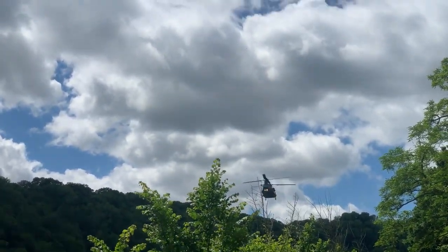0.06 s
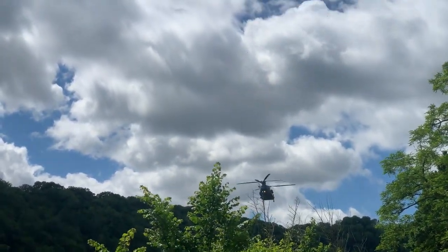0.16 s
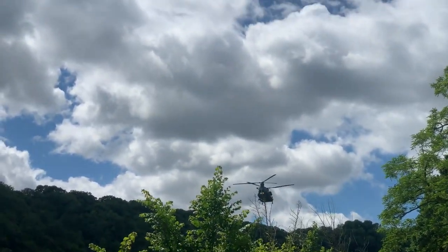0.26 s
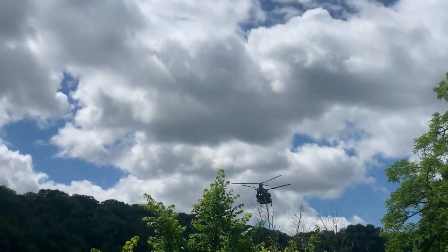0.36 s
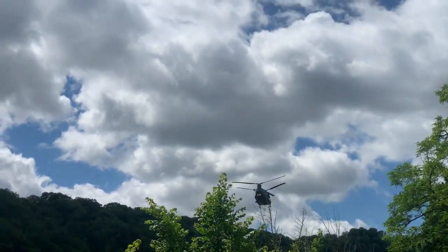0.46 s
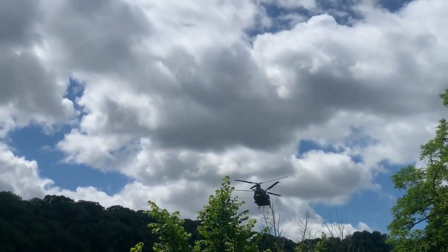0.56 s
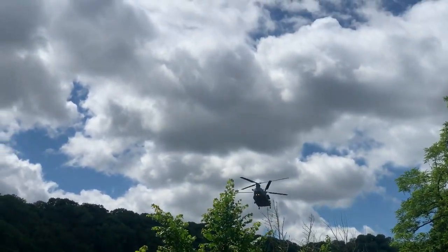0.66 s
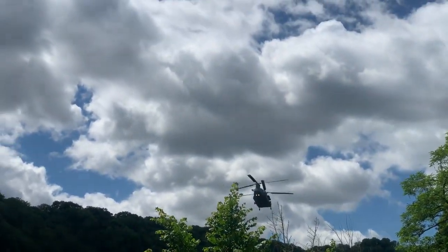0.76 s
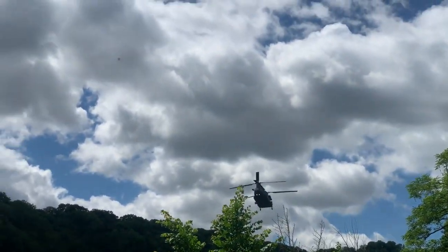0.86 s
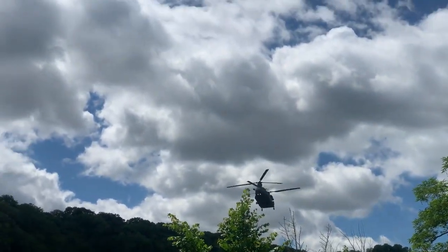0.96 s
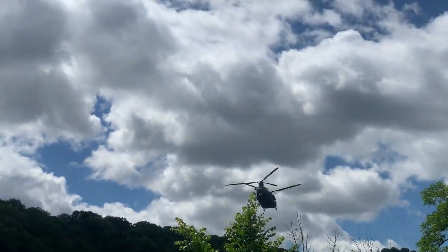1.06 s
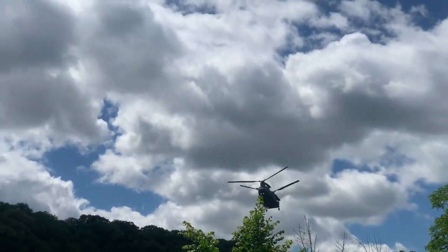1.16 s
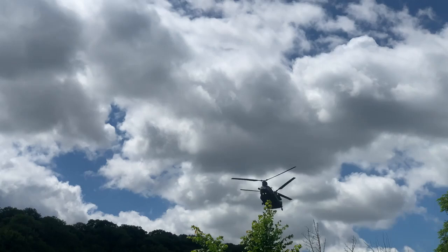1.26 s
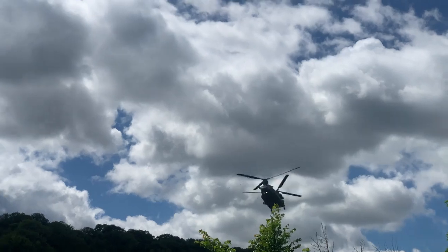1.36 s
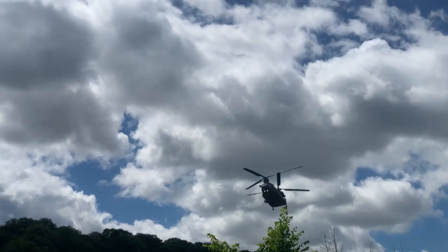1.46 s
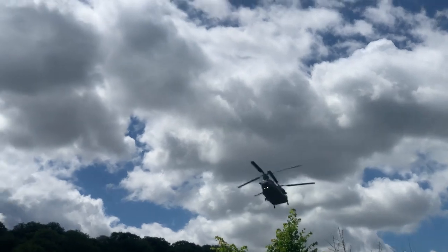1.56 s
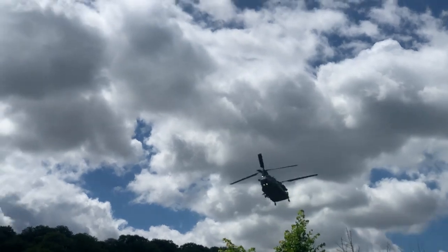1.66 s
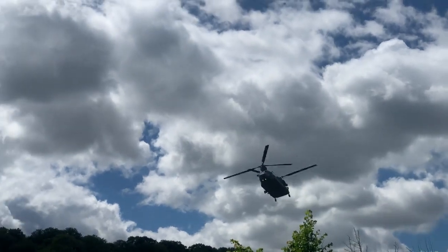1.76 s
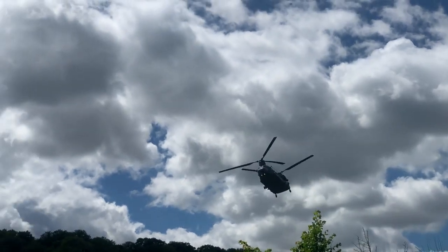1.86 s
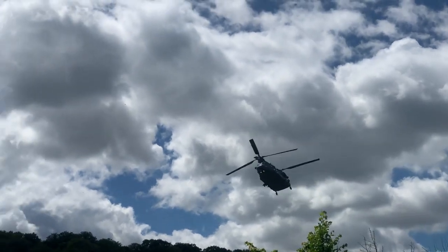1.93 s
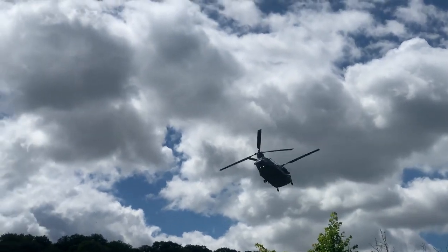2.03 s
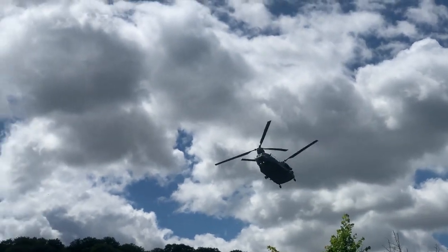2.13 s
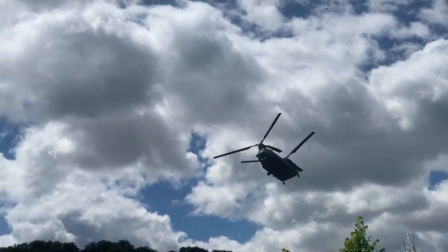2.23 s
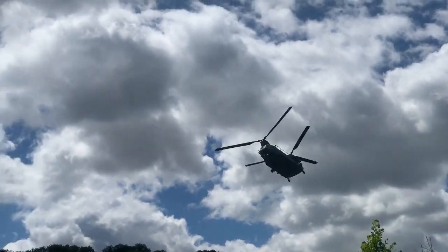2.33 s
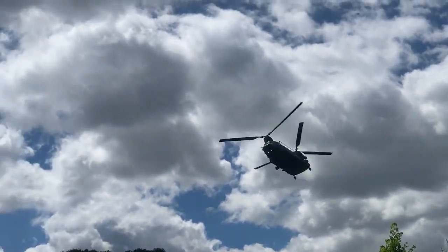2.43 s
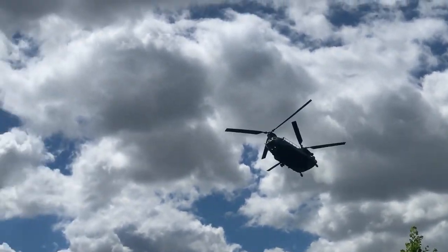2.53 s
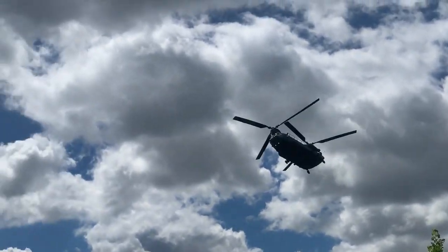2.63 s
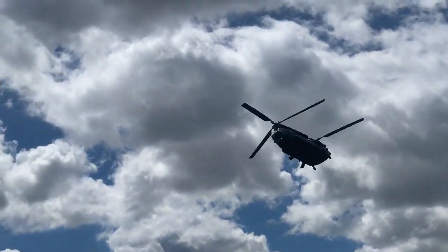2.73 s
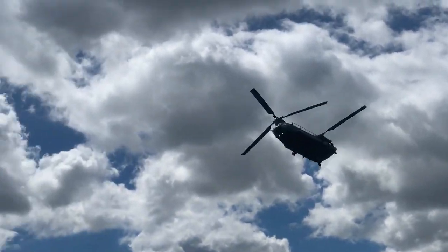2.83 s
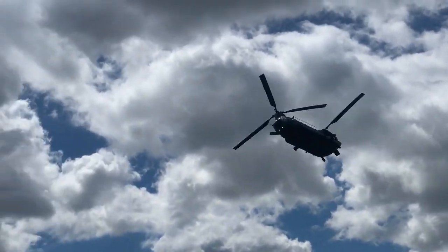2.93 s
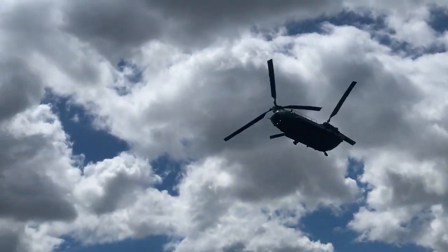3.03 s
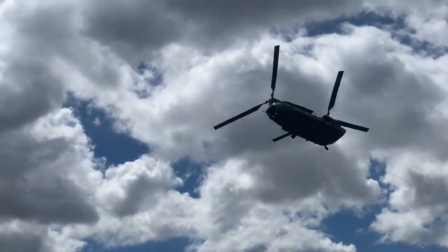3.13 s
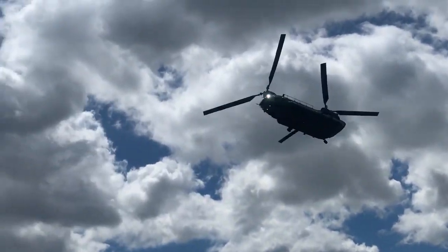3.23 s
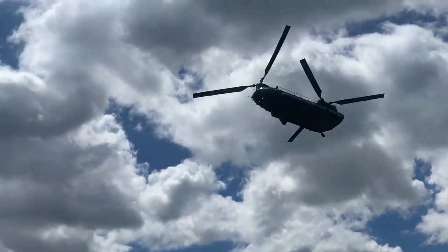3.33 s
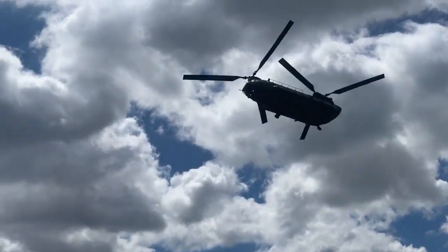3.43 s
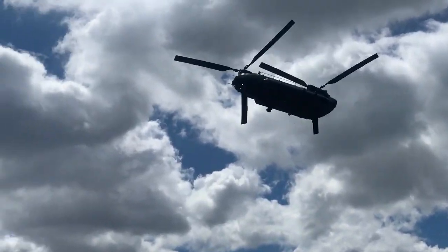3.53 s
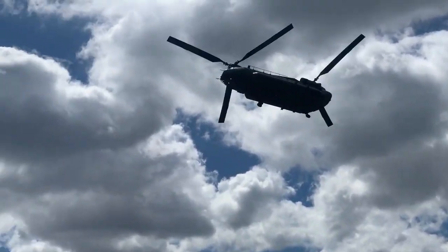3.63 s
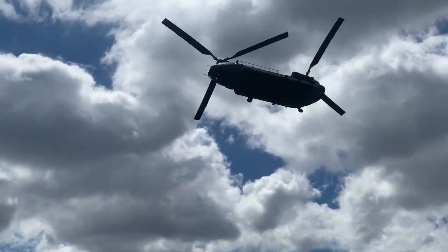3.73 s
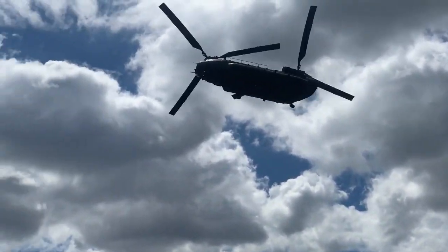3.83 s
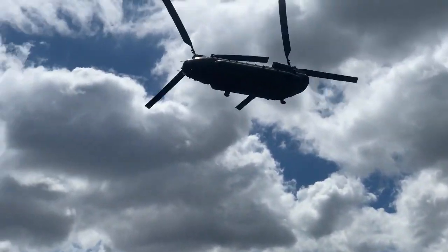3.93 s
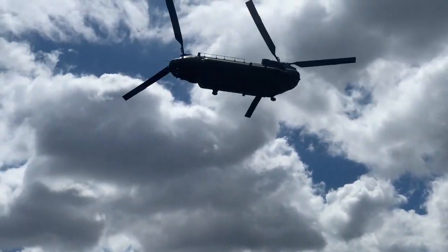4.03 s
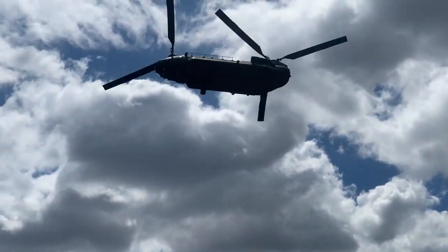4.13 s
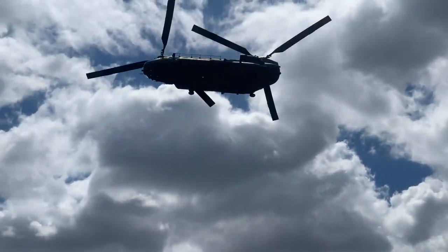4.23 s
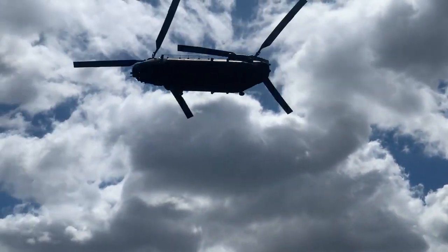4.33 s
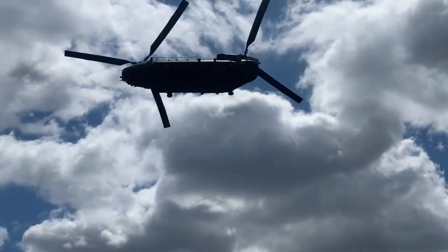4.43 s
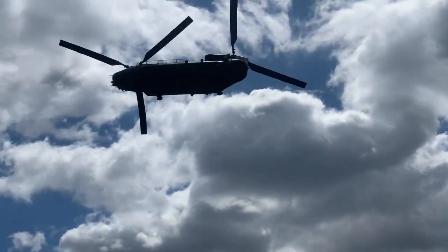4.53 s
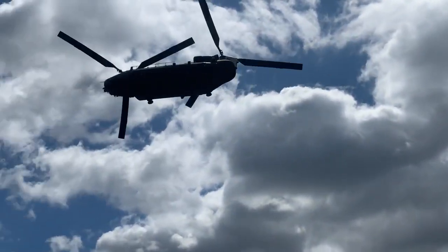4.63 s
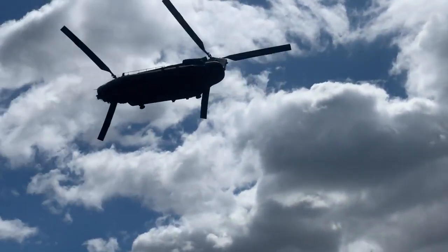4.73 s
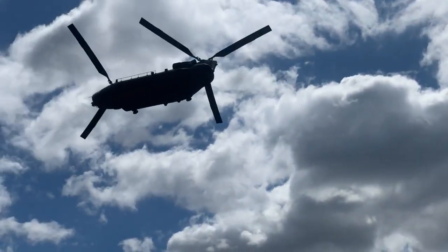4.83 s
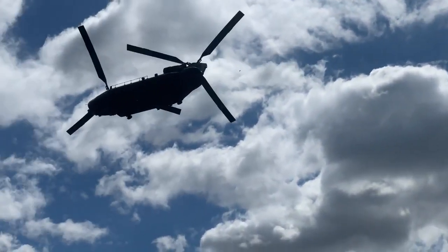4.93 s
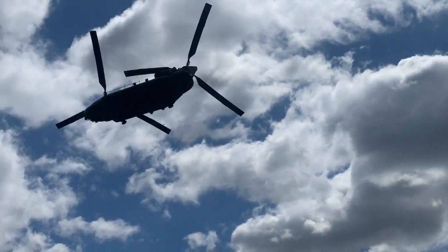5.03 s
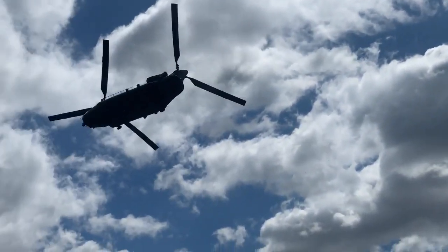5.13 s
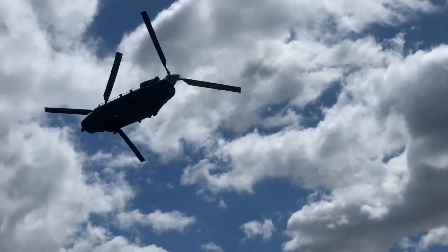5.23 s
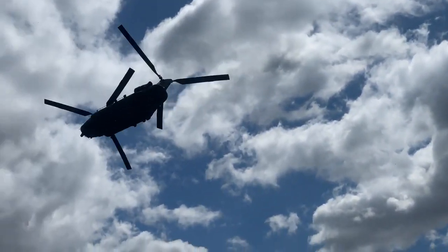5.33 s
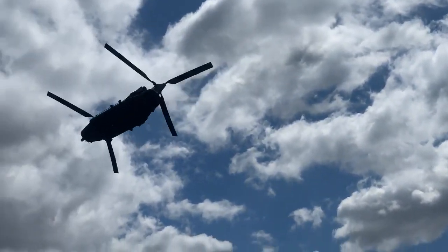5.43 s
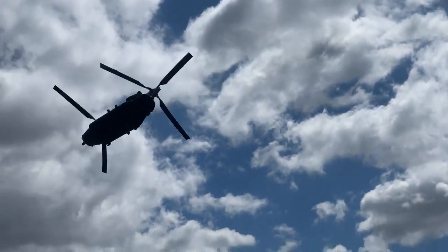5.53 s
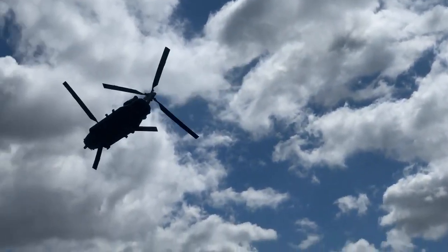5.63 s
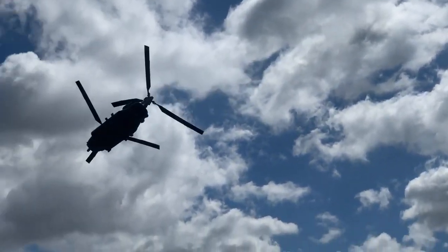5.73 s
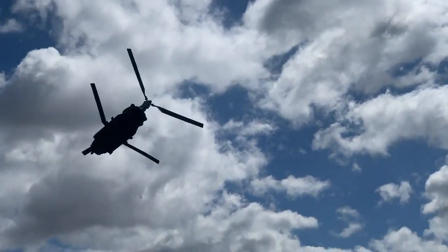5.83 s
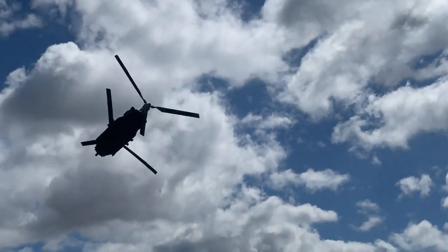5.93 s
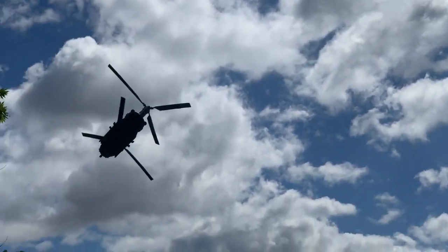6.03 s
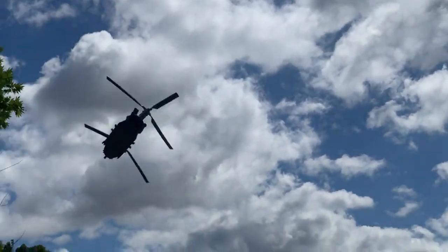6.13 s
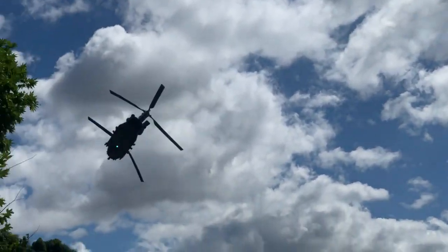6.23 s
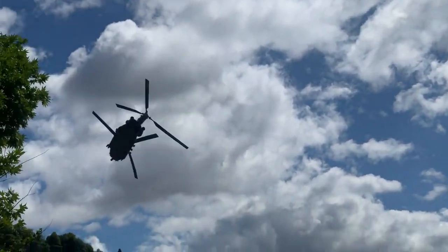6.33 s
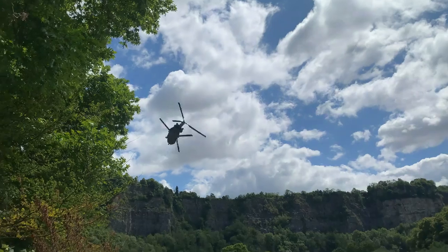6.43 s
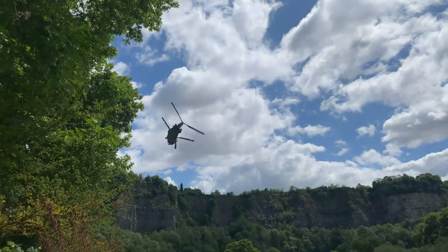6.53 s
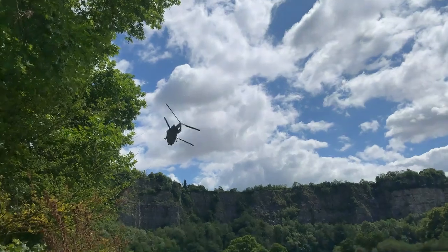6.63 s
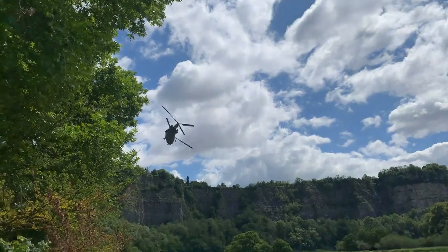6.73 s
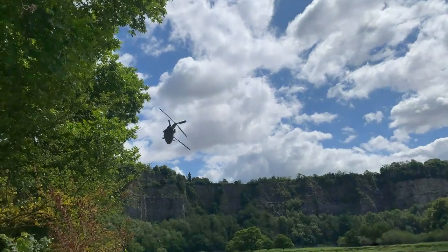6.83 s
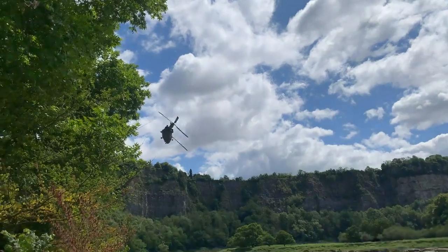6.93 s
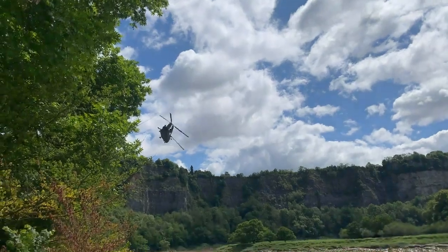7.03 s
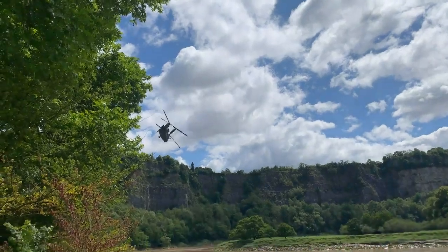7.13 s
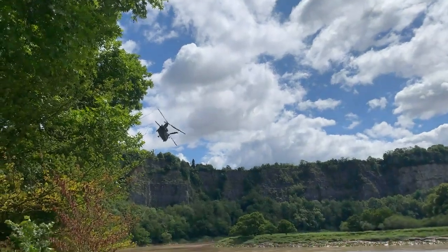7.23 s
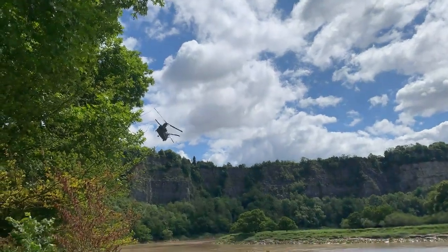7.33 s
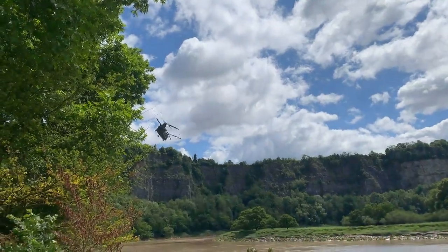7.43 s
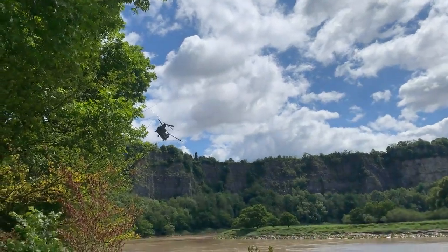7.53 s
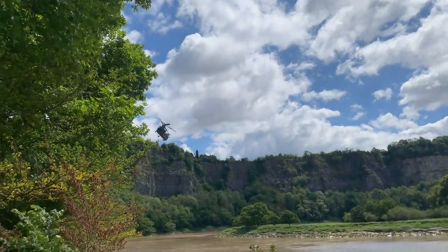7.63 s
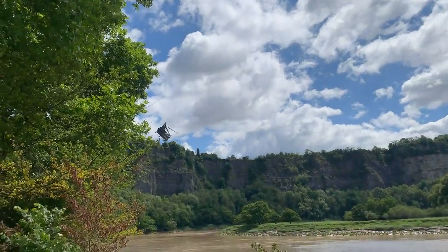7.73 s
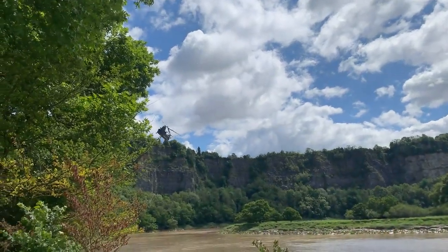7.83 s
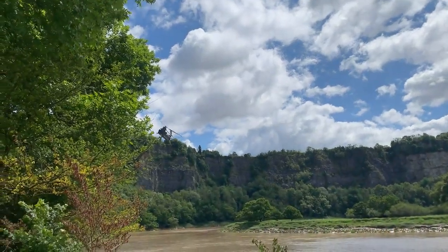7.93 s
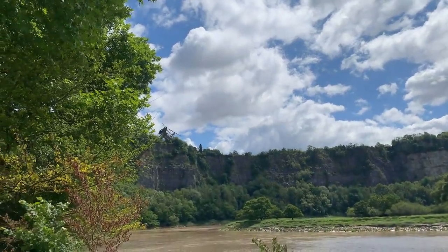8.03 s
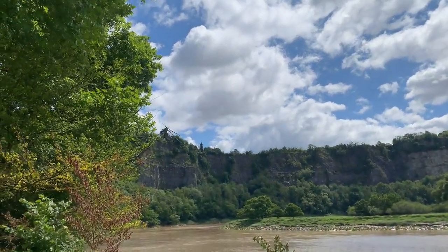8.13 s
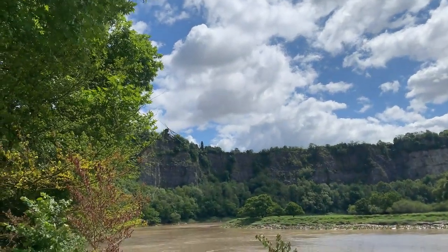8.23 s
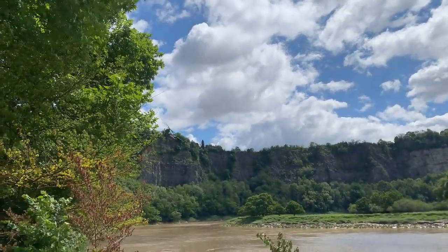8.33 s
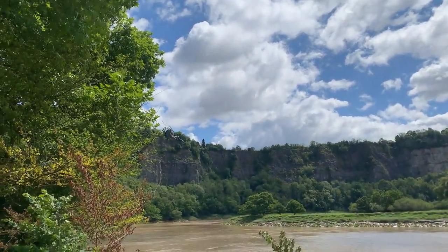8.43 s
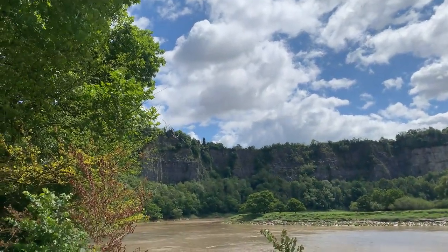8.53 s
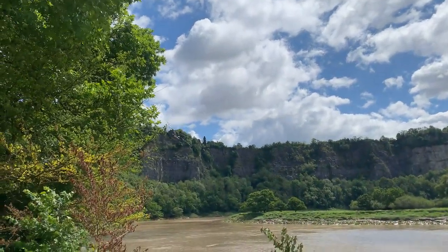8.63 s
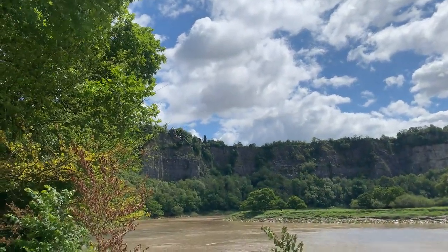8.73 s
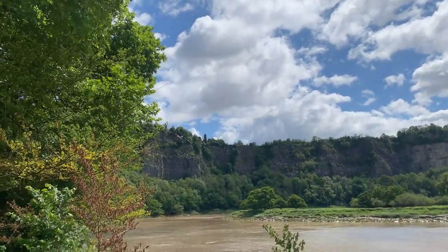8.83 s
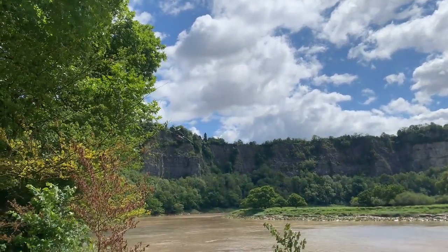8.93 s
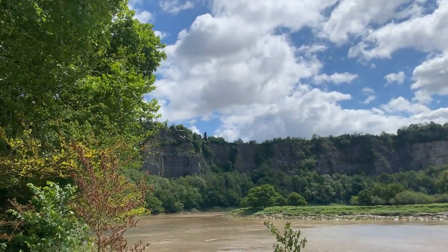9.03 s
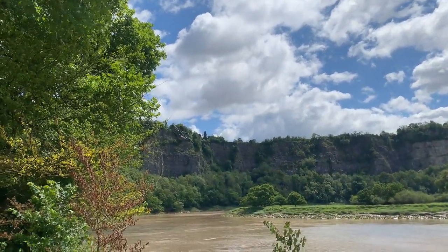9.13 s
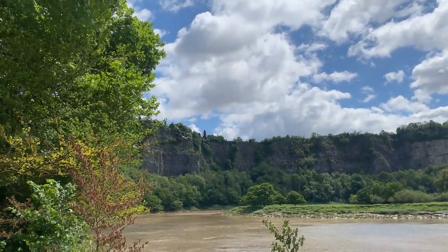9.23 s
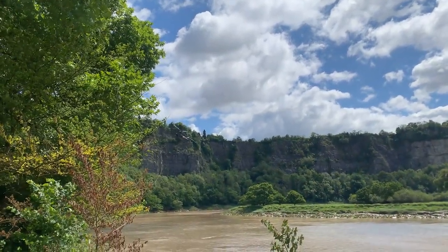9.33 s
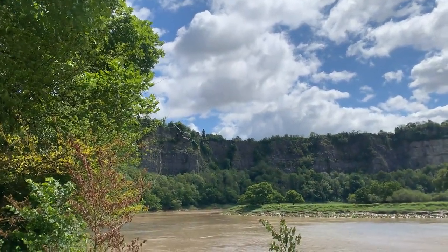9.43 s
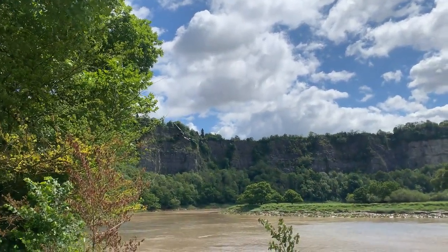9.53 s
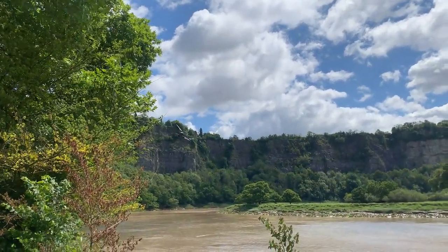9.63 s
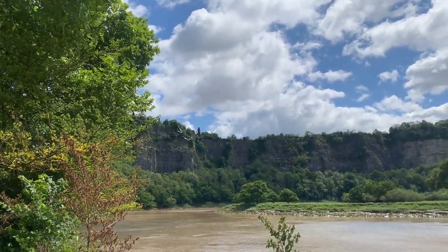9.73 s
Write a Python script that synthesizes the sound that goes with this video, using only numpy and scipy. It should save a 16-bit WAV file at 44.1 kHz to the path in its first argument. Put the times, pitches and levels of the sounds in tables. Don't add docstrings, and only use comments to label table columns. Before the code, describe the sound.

Fast chopping rotor slaps approach loudly, pass above with a downward pitch glide, then soften into a dull, distant throb across an open valley.

```python
import sys
import numpy as np
from scipy import signal
from scipy.fft import rfft, irfft, next_fast_len
from scipy.io import wavfile
from scipy.ndimage import uniform_filter1d, minimum_filter1d, map_coordinates

SR = 44100
rng = np.random.default_rng(int(sys.argv[2]) if len(sys.argv) > 2 else 0)


def waveform_to_disk(signal):
    frames = np.transpose(np.atleast_2d(signal))
    scaled = np.clip(frames, -1, 1) * 32767
    samples = np.round(scaled).astype(np.int16)
    wavfile.write(sys.argv[1], SR, samples)


def ratio_of_db(decibels):
    return 10 ** (np.asarray(decibels, float) / 20)


N = 430416
TIME = np.arange(N) / SR


def unit(x):
    return x / np.sqrt(np.mean(x ** 2) + 1e-20)


def along(points, hz):
    f, v = np.transpose(points)
    return np.interp(np.log(hz + 1), np.log(f + 1), v)


def curves(rows, at=TIME):
    s, *columns = np.transpose(rows)
    return [np.interp(at, s, column) for column in columns]


def wobble(rate):
    coarse = TIME[::16]
    knots = rng.standard_normal(int(N * rate / SR) + 4)
    return np.interp(TIME, coarse, map_coordinates(knots, [coarse * rate]))


def filtered(x, response):
    m = next_fast_len(N + 8192)
    return irfft(rfft(x, m) * response(np.fft.rfftfreq(m, 1 / SR)), m)[..., :N]


def delayed(x, ms, order=1):
    return map_coordinates(x, [np.arange(N) - ms * SR / 1000], order=order, mode="mirror")


# time in seconds, blades per second.
BLADE_RATE = [(0, 13.335), (1, 13.236), (1.5, 13.149), (2, 13.018), (2.5, 12.826), (3, 12.659),
              (3.5, 12.389), (4, 11.989), (4.5, 11.52), (5, 11.051), (5.5, 10.68), (6, 10.423),
              (6.5, 10.25), (7, 10.134), (8, 10.028), (8.5, 10.03), (9.5, 10.1)]


def blade_rate(at=TIME):
    return curves(BLADE_RATE, at)[0]


REST_RATE, MACH = 11.45, .142


def facing():
    return (1 - REST_RATE / blade_rate()) / MACH


START_M, CLOSEST_M = 242, 65


def distance():
    return START_M - 343 * np.cumsum(blade_rate() / REST_RATE - 1) / SR


def heard(db, spread, absorb_db, forward_db):
    r = distance()
    spreading_db = spread * 20 * np.log10(r / CLOSEST_M)
    absorption_db = absorb_db * (r - CLOSEST_M) / 100
    return db - spreading_db - absorption_db + forward_db * facing()


TREES_S = 7.6


def screen():
    return 1 / (1 + np.exp((TREES_S - TIME) / 1.0))


# frequency in Hz, left-right likeness 0-1.
LIKENESS = [(60, .99), (250, .95), (600, .93), (1200, .72), (2500, .45), (5000, .55), (7000, .5),
            (7700, .6), (12000, .3)]


def rush(spectrum, patchy_db):
    z = signal.stft(rng.standard_normal((2, N + 512)), nperseg=512)[2]
    field = uniform_filter1d(rng.standard_normal(z.shape[1:]), size=5, axis=0)
    field = uniform_filter1d(field, size=8, axis=1)
    pair = signal.istft(z * ratio_of_db(patchy_db * unit(field)), nperseg=512)[1][:, :N]

    def mid_side(hz):
        turn = np.arccos(np.clip(along(LIKENESS, hz), 0, .999)) / 2
        return ratio_of_db(along(spectrum, hz)) * [np.cos(turn), np.sin(turn)]

    mid, side = filtered(pair, mid_side)
    return unit(np.array([mid + side, mid - side]))


def bursts(events, late_s, rise_s, fall_s):
    s, db = np.transpose(events)
    nearest = np.searchsorted((s[1:] + s[:-1]) / 2 + late_s, TIME)
    since = TIME - s[nearest] - late_s
    return ratio_of_db(db[nearest]) * np.exp(-.5 * (since / np.where(since < 0, rise_s, fall_s)) ** 2)


def cycle(track):
    return np.cumsum(blade_rate()) / SR - curves(track)[0]


def pulses(track, late, multiple, cycles, glide, level_db, scatter_db=1, rise=0):
    turns = cycle(track) - late
    whole = np.arange(np.ceil(turns[0]), turns[-1])
    at = np.interp(whole, turns, TIME)
    chance = rng.standard_normal((len(at), 3))
    detune = 1 + .02 * chance[:, 0] - rise * np.interp(at, TIME, facing())
    hz = np.interp(at, TIME, multiple + 0 * TIME) * blade_rate(at) * detune
    start = np.round(at * SR).astype(int)
    step = np.arange(-1500, 1500)
    u = hz[:, None] * (step + (start - at * SR)[:, None]) / SR + .025 * chance[:, 1:2]
    wave = np.exp(-.5 * (u / cycles) ** 2) * np.sin(2 * np.pi * (u - glide * u * u / 2))
    size = ratio_of_db(np.interp(at, TIME, level_db) + scatter_db * chance[:, 2])
    where = (start[:, None] + step + 1500).ravel()
    return np.bincount(where, (size[:, None] * wave).ravel(), N + 3000)[1500:N + 1500]


# frequency in Hz, decay time T60 in seconds.
VALLEY_DECAY = [(60, 0.54), (500, 0.75), (4000, 0.06)]


def valley(x):
    hz, t, z = signal.stft(rng.standard_normal((2, SR)), SR, nperseg=256)
    decay = ratio_of_db(-60 * t / along(VALLEY_DECAY, hz)[:, None])
    tail = signal.istft(z * decay, SR, nperseg=256)[1]
    late = np.pad(x, (500, 0))[None]
    return signal.fftconvolve(late, tail / np.linalg.norm(tail[0]), axes=1)[:, :N]


# time in seconds, swell in dB.
ENGINE_FLARES = [(2.4, 9.7), (2.719, 15), (3.2, 1.7), (3.62, 9), (3.8, 4.1), (3.97, 10), (7.4, 3.8),
                 (7.699, 4.4)]


def flares(width):
    return sum(db * np.exp(-.5 * ((TIME - s) / width) ** 2) for s, db in ENGINE_FLARES)


# time in seconds, level in dB.
ROTOR_LOUDNESS = [(0, -13.5), (.4, -10.5), (.8, -14), (1.3, -10.5), (1.7, -12), (2.1, -9), (2.45, -9),
                  (2.8, -8.5), (3.2, -13), (3.9, -9), (4.4, -10), (5.1, -12.5), (5.7, -15), (6.5, -20.5),
                  (7, -21.5), (7.6, -23.5), (8.5, -25), (9.1, -21.5)]
# frequency in Hz, density in dB per Hz.
ROAR_SPECTRUM = [(12, -51), (20, -33), (53, 4.5), (134, 0), (226, -1), (274, -5), (300, -5.5), (343, -7.5),
                 (700, -26.5), (910, -22), (1540, -120)]
WASH_SPECTRUM = [(240, -44.5), (400, -9), (565, -4.5), (1180, -17), (1340, -9.5), (1610, -17.5),
                 (1760, -14), (2050, -15.5), (3000, -25.5), (3900, -39.5), (6600, -120)]
JET_SPECTRUM = [(1180, -47), (2000, -3), (3100, -7.5), (3670, -3), (5000, -8), (6310, -9.5), (7300, -14),
                (9490, -46), (16100, -120)]


def air():
    loud_db = curves(ROTOR_LOUDNESS)[0] + 12
    roar_db = -14 + 1.12 * loud_db - 3.5 * facing() - 1.5
    wash_db = -31 + 0.5 * loud_db + 0.38 * facing()
    jet_db = heard(-42.0, spread=0.39, absorb_db=4.5, forward_db=0.5) - 0.83 * screen() + 0.44 * flares(0.14)
    gust_db = .45 * wobble(9)
    peaks = [np.exp(1.95 * np.cos(2 * np.pi * (cycle(rotor) - .06)) - 2.5) for rotor in (AFT_SLAPS, FORE_SLAPS)]
    beat = sum(peaks) * 2 - 1
    roar_beat_db = (2.44 * beat + 1.7 * wobble(45)) * (1.5 - .6 * screen())
    roar = ratio_of_db(roar_db + gust_db + roar_beat_db) * rush(ROAR_SPECTRUM, patchy_db=0.0)
    wash = ratio_of_db(wash_db + gust_db + 1.8 * beat + 1.33 * wobble(70)) * rush(WASH_SPECTRUM, patchy_db=1.5)
    jet = ratio_of_db(jet_db + gust_db + 1.8 * beat) * rush(JET_SPECTRUM, patchy_db=1.7)
    return roar + wash + jet


# frequency in Hz, density in dB per Hz.
HISS_SPECTRUM = [(7300, -120), (7600, -6), (8200, -1.5), (9500, -2), (10900, -9.5), (11200, -26.5),
                 (12200, -47.5), (12500, -7), (14800, -17), (15400, -120)]
INTAKE_SPECTRUM = [(7500, -57), (7700, 3.5), (7900, 1.5), (8150, 2.5), (8500, 2), (9100, -28)]
# time in seconds, peak in dB.
INTAKE_PUFFS = [(2.4139, -40.5), (2.567, -41), (2.6583, -37), (2.7222, -33.5), (2.81, -39), (3.1816, -39.5),
                (3.2724, -44), (3.3587, -39), (3.4336, -34.5), (3.5209, -36.5), (3.5598, -28),
                (3.6201, -30.5), (3.693, -35.5), (3.889, -28.5), (3.9783, -19.5), (4.2333, -37),
                (4.3151, -30.5), (4.4882, -30.5), (4.573, -39), (4.6608, -40.5)]


def hiss():
    hiss_db = heard(-44.0, spread=0.85, absorb_db=13, forward_db=0.0)
    far_db = hiss_db - hiss_db.max()
    noise = rush(HISS_SPECTRUM, patchy_db=2.0)
    low = filtered(noise, lambda hz: np.clip((10200 - hz) / 2600, 0, 1))
    top = filtered(noise, lambda hz: hz > 11700)
    middle = noise - low - top
    layers = ratio_of_db(-.1 * far_db) * low + ratio_of_db(.35 * far_db) * middle + ratio_of_db(.7 * far_db) * top
    exhaust = ratio_of_db(hiss_db + 1.2 * np.cos(2 * np.pi * cycle(AFT_SLAPS))) * layers
    off_beam = np.minimum(np.abs(facing() - .5), 1.1)
    beam_db = heard(-46.0, spread=2.2, absorb_db=4.5, forward_db=5) - 24 * off_beam
    puffs = ratio_of_db(-11.5) * bursts(INTAKE_PUFFS, late_s=.006, rise_s=0.0041, fall_s=0.011)
    whistle = (ratio_of_db(beam_db + 1.5 + 1.2 * wobble(14)) + puffs) * rush(INTAKE_SPECTRUM, patchy_db=2.0)
    return exhaust + whistle


# time in seconds, speed as a multiple of the blade rate, beam in dB.
COMPRESSOR = [(0, 600, 4), (2, 608, 5), (2.6, 615, 10), (3.6, 630, 9), (4.6, 621.5, 3), (5.4, 609.5, -3),
              (6.2, 596, -2), (6.6, 591.5, 0), (7.3, 594, 3), (8, 608, 0), (9.76, 623, -1)]
GEAR_MESHES = [172.5, 345, 517.5, 132, 328, 278]
# level in dB, forward throw in dB.
GEAR_LEVELS = [(3.5, -9), (-9, -8), (-17, -9), (-7, -9), (-5, 5), (-6, -9)]
# time in seconds, width in seconds, lobe in dB.
GEAR_BEAMS = [(7.5, .6, 2), (6, .6, 7.5), (6, .5, 6), (7.6, .6, 8.5), (7.8, .5, 5), (7.9, .5, 6)]


def whine():
    compressor_db = heard(-61.5, spread=1.2, absorb_db=2.5, forward_db=-7) - 5 * screen()
    gear_db = heard(-57, spread=.5, absorb_db=0, forward_db=0) - 5.5 * screen()
    speed, beam_db = curves(COMPRESSOR)
    spin = np.cumsum(speed * blade_rate()) / SR + .24 * wobble(120)
    flutter_db = 2.5 * wobble(30) + 2 * wobble(6)
    out = ratio_of_db(compressor_db + beam_db + 7 + flutter_db) * np.sin(2 * np.pi * spin)
    turns = np.cumsum(blade_rate()) / SR
    for mesh, (db, forward_db), (s, width, lobe_db) in zip(GEAR_MESHES, GEAR_LEVELS, GEAR_BEAMS):
        shake = mesh / 620 * wobble(40)
        flutter_db = 2.5 * wobble(24) + 2.5 * wobble(3) - 2
        db = db + lobe_db * np.exp(-.5 * ((TIME - s) / width) ** 2)
        level_db = gear_db + db + forward_db * facing() + flutter_db
        out += ratio_of_db(level_db) * np.sin(2 * np.pi * (mesh * turns + shake))
    return np.sqrt(2) * out


# time in seconds, peak in dB.
TIP_CRACKS = [(0.0383, -16), (0.11, -14.5), (0.1857, -17.5), (0.2563, -22.5), (0.3368, -20.5),
              (0.4085, -19.5), (0.4843, -20), (0.562, -18), (0.6364, -23.5), (0.7083, -17), (0.782, -19.5),
              (0.86, -16.5), (0.9368, -13.5), (1.0147, -19.5), (1.0838, -19.5), (1.156, -23), (1.2396, -17),
              (1.3074, -12), (1.3836, -13), (1.4666, -18), (1.544, -17.5), (1.6127, -17.5), (1.6906, -24),
              (1.7677, -21), (1.844, -21.5), (1.922, -15.5), (1.996, -15), (2.08, -18), (2.153, -17.5),
              (2.2313, -16), (2.3072, -16), (2.386, -21), (2.4607, -16.5), (2.532, -17.5), (2.613, -20),
              (2.698, -23), (2.7528, -23), (2.8265, -18), (2.9213, -17.5), (3.0016, -23), (3.0795, -20),
              (3.1605, -23.5), (3.239, -23.5), (3.3164, -24.5), (3.3997, -24), (3.473, -28.5),
              (3.5493, -21), (3.6352, -21), (3.715, -23.5), (3.7923, -27.5), (3.8698, -23), (3.937, -33),
              (4.0368, -25.5), (4.118, -29.5), (4.1972, -28.5), (4.2794, -33.5), (4.364, -28),
              (4.4493, -23)]
# time in seconds, peak in dB.
DULL_RAGS = [(3.636, -6.5), (3.722, -7), (3.789, -8.5), (3.824, -5.5), (3.873, -6), (3.908, -6.5),
             (3.954, -5), (3.99, -4), (4.038, -16), (4.072, -3), (4.112, -18.5), (4.145, -11.5),
             (4.195, -9.5), (4.279, -8.5), (4.315, -15), (4.361, -20), (4.413, -7.5), (4.447, -8),
             (4.502, -10.5), (4.544, -12), (4.589, -17), (4.638, -18), (4.677, -9), (4.708, -11.5),
             (4.765, -17.5), (4.82, -21), (4.856, -14.5), (4.945, -17), (5.036, -10.5), (5.105, -11),
             (5.126, -9), (5.199, -13.5), (5.238, -9.5), (5.273, -16), (5.492, -16), (5.589, -16.5),
             (5.686, -11.5), (5.74, -14), (5.838, -10.5), (6.022, -21.5), (6.076, -26), (6.117, -17),
             (6.173, -16.5), (6.223, -16), (6.27, -15), (6.419, -19), (6.515, -18.5), (6.555, -21.5),
             (6.615, -21), (6.654, -22)]
# frequency in Hz, density in dB per Hz.
TIP_SPECTRUM = [(150, -40.5), (300, 3.5), (600, 2.5), (1000, -4.5), (1500, -11), (2500, -18.5),
                (4500, -31.5), (5600, -45), (9000, -54.5), (15000, -87.5)]


def crack():
    bed = ratio_of_db(-35.5 + 3.07 * np.minimum(facing(), .6))
    gate = ratio_of_db(3) * bursts(TIP_CRACKS, late_s=.004, rise_s=.007, fall_s=.014) + bed
    noise = ratio_of_db(1.6 * wobble(350)) * rush(TIP_SPECTRUM, patchy_db=1.5)
    dull = uniform_filter1d(noise, size=18, axis=1)
    rags = ratio_of_db(-9.5) * bursts(DULL_RAGS, late_s=0.0033, rise_s=0.0024, fall_s=0.0068)
    return gate * noise + rags * dull


# time in seconds, peak in dB, body in dB.
TIP_SHOCKS = [(1.6113, -28, 0), (2.611, -26.5, 5.5), (2.825, -17, -3.5), (2.9207, -12.5, -2),
              (2.934, -21, -2), (3.066, -23.5, -1.5), (3.159, -26, 3), (3.551, -32, -2.5),
              (3.872, -28, 5.5), (4.4481, -21.5, 3.5), (7.948, -31.5, 2.5), (8.049, -26.5, 1),
              (8.151, -32, 3.5), (9.243, -31.5, 10)]


def shocks():
    out, t = np.zeros(N + SR), np.arange(SR // 20) / SR
    for s, db, body_db in TIP_SHOCKS:
        sharp, dull = rng.standard_normal((2, len(t)))
        front = np.diff(sharp, prepend=0) * 0.33
        body = ratio_of_db(body_db + 6) * uniform_filter1d(dull, size=16)
        out[round(s * SR):][:len(t)] += ratio_of_db(db - 60 * t / 0.024) * (front + body)
    colour = [(500, -9), (900, 13.0), (2500, 7.5), (9000, -5), (14000, -16)]  # Hz, dB
    return filtered(out[:N], lambda hz: ratio_of_db(along(colour, hz)))


def thumps():
    ahead = facing()
    tail_lobe_db = 12.0 * np.exp(-.5 * ((ahead + .84) / 0.11) ** 2)
    nose_lobe_db = 4 * np.exp(-.5 * ((ahead - .72) / .1) ** 2)
    loud_db = curves(ROTOR_LOUDNESS)[0] + tail_lobe_db + nose_lobe_db - 3.5 * screen()
    upper_db = loud_db - 2.5 + 1.5 * ahead + 0.83 * ahead ** 2
    lower_db = loud_db - 7.5 + 2.4 * ahead + 5.0 * ahead ** 2
    upper = pulses(AFT_SLAPS, 0.084, multiple=12.2, cycles=0.47, glide=.02, level_db=upper_db)
    lower = pulses(AFT_SLAPS, -.28 + 0.1 * ahead, multiple=4.6, cycles=0.46, glide=.02, level_db=lower_db)
    return upper + lower


def slap(track, boom, boom_late, front_db, snap_db, forward_db, rise):
    strength_db, snap_pitch = curves(track)[1:]
    sharp_db = strength_db + snap_db + forward_db * facing()
    boom_db = strength_db + 1.8 * np.maximum(facing(), 0)
    front = pulses(track, -.035, 55, cycles=.5, glide=.35, scatter_db=2.5, level_db=sharp_db + front_db)
    snap = pulses(track, 0, snap_pitch, cycles=0.64, glide=0.29, level_db=sharp_db)
    return front + snap + pulses(track, boom_late, boom, cycles=0.53, glide=0.13, rise=rise, level_db=boom_db)


# time in seconds, place in the blade cycle,
# strength in dB, snap pitch as a multiple of the blade rate.
AFT_SLAPS = [(0, 0.54, 5.5, 28), (.4, 0.55, -5.5, 27), (.8, .53, -6.5, 27), (1.2, 0.57, -4, 25),
             (1.7, 0.55, -10, 22), (2, 0.58, -2.5, 22), (2.4, 0.5, -8.5, 21), (2.8, 0.55, -10.5, 19),
             (3.2, 0.53, -10.5, 18), (3.6, 0.54, -15.5, 20), (4, 0.53, -5, 22), (4.6, 0.58, -6, 22),
             (5.2, .579, -8, 22), (5.6, .6, -13.5, 20), (6, 0.59, -22, 20), (7.2, 0.75, -33, 22),
             (8.4, .63, -33, 22), (9.76, 0.63, -40, 22)]
FORE_SLAPS = [(0, 0.044, -13, 18.8), (1.2, 0.078, -19.5, 19), (1.6, 0.057, -12.5, 14.5),
              (2, .08, -10.5, 19), (2.6, .13, -17.5, 16.6), (3.2, 0.24, -7.5, 17.5), (3.6, 0.27, -5, 14.6),
              (4, 0.22, -6.5, 22.4), (4.4, 0.22, -8.5, 16), (4.8, 0.22, -5, 23.3), (5.2, 0.25, -9, 19),
              (5.6, 0.23, -11, 22), (6.4, .24, -5, 15), (6.8, 0.23, -6, 17), (7.3, 0.25, -11.5, 17.5),
              (8, 0.38, -29.5, 26), (9, 0.28, -21, 12), (9.76, 0.2, -23, 25)]


def slaps():
    aft = slap(AFT_SLAPS, boom=10.9, boom_late=0.0883, front_db=-7.0, snap_db=2.5, forward_db=1.5, rise=0.02)
    fore = slap(FORE_SLAPS, boom=11.86, boom_late=0.044, front_db=-13.5, snap_db=-4.0, forward_db=8.5, rise=0.15)
    return aft + fore


# time in seconds, ground echo lag in ms, left lead in ms.
ARRIVAL_LAGS = [(0, 2.2, .27), (.7, 2.5, .28), (1.7, 3.25, .27), (2.7, 4.5, .15), (3.2, 5.2, .02),
                (4.1, 7.1, -.05), (4.6, 8.2, .25), (5.2, 8.1, .27), (6.2, 7.1, .3), (7.2, 5.9, .33),
                (8.2, 4.6, .33), (9.76, 4.4, .32)]


def scene():
    echo_ms, lead_ms = curves(ARRIVAL_LAGS)
    echo_db = -3.5 - 0.77 * (echo_ms - 2) - 9 * screen()
    beats = slaps() + thumps() + shocks()
    direct = beats + crack() + air()
    dull = filtered(direct, lambda hz: 1 / np.sqrt(1 + (hz / 1100) ** 2))
    left, right = [d + ratio_of_db(echo_db) * delayed(g, echo_ms) for d, g in zip(direct, dull)]
    pair = ratio_of_db(0.5) * np.array([left, delayed(right, lead_ms, order=2)])
    return pair + ratio_of_db(-22.0) * valley(beats) + hiss() + whine()


# frequency in Hz, left minus right in dB.
CAPSULE_LEAN = [(60, -1), (110, -1), (200, -4), (380, -1), (700, 2), (1290, 2.5), (2380, -1), (4400, -2.5),
                (8120, 0), (15000, 0)]


def microphones(hz):
    shorter_s = .00005 * hz ** 2 / (hz ** 2 + 400 ** 2) * (hz < 7500)
    turn = np.exp(-1j * np.pi * hz * shorter_s * np.array([[1], [-1]]))
    bass_cut = hz ** 3 / (hz ** 3 + 34 ** 3)
    return turn * ratio_of_db(along(CAPSULE_LEAN, hz) * [[.5], [-.5]]) * bass_cut


# time in seconds, readiness to stay, lower edge share 0-1.
BAND_DROPOUT = [(0, -.8, .6), (2, -.5, .6), (4.2, -.2, .6), (4.6, 1.6, .2), (6, 1.3, .2), (7.2, -.8, .5),
                (8.6, -1.9, .7), (9.76, -2.4, .8)]


def dropouts(x):
    stay, wide = curves(BAND_DROPOUT)
    common, out = wobble(7.3), x.copy()
    for k, low_hz in enumerate(range(7400, 6300, -200)):
        readiness = stay + k * (.55 - .45 * wide) + .6 * common + .9 * wobble(36)
        lost = 1 - np.clip(4 * readiness, 0, 1)
        out -= lost * filtered(x, lambda hz: (hz > low_hz) & (hz <= low_hz + 200))
    return out


def roll_off(x):
    return signal.sosfilt(signal.butter(12, 15640, fs=SR, output="sos"), x)


# frequency in Hz, gain in dB.
TREBLE_GAP = [(11000, 0), (11250, -40), (12200, -37), (12450, -2.5)]


def record(dry):
    x = filtered(dry * np.minimum(1, TIME * 200), microphones)
    need = np.minimum(1, .9 / (np.abs(x).max(axis=0) + 1e-9))
    x = x * uniform_filter1d(minimum_filter1d(need, size=260), size=250)
    x = filtered(x, lambda hz: ratio_of_db(along(TREBLE_GAP, hz)))
    return roll_off(dropouts(x))


dry = scene()
out = record(dry)
waveform_to_disk(out)
```